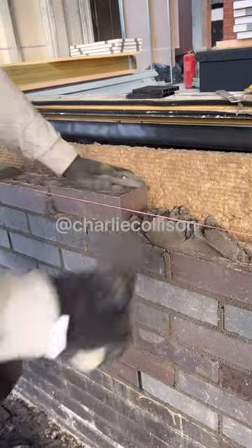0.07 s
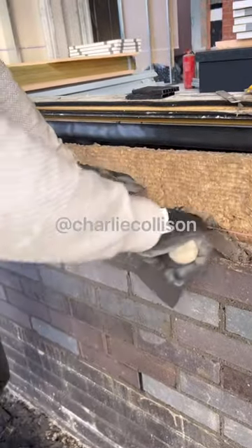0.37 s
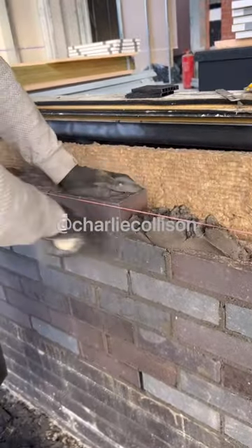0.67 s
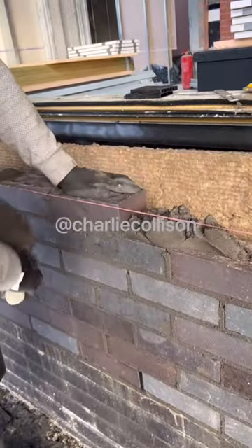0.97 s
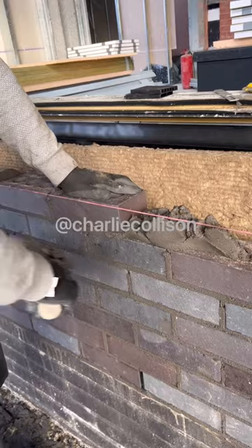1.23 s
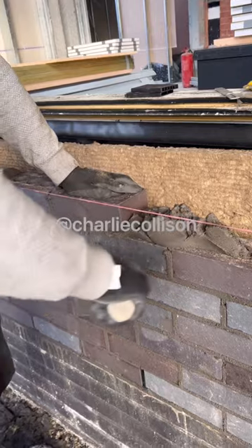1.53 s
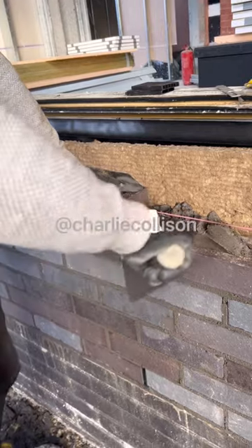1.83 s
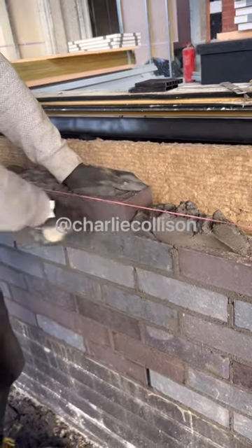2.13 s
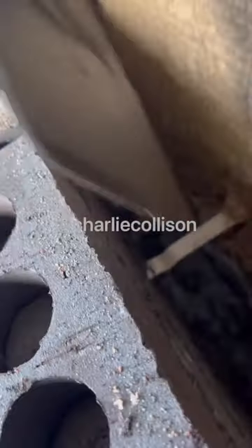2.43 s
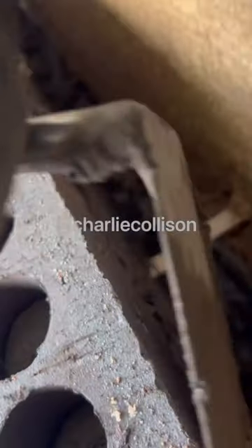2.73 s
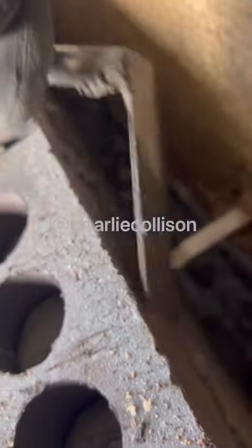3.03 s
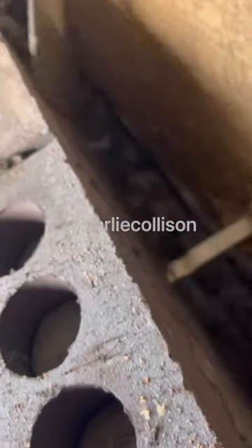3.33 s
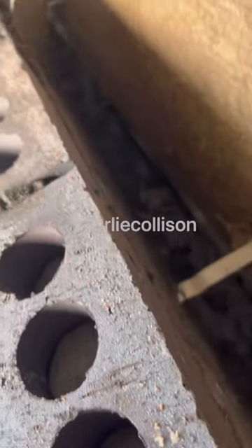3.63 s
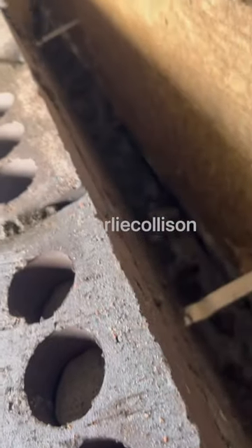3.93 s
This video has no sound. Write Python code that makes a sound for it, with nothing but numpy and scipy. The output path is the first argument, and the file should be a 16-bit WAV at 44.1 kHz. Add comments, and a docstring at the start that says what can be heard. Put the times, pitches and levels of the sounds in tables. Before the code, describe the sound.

A steel trowel scrapes over brick and gritty mortar, above a low building-site rumble.

```python
"""Two rasping sweeps of a steel trowel on brick; then, much closer, a narrow blade taps in and is
dragged along a mortar joint. Sand grains crackle under the steel, which catches on coarse grit
and rings briefly. Loose mortar lands with dull knocks. Behind it a low drone, perhaps a machine,
wavers over the rumble of a building site."""
import sys
import numpy as np
from scipy import signal
from scipy.fft import rfft, irfft, next_fast_len
from scipy.io import wavfile
from scipy.ndimage import uniform_filter1d, map_coordinates

SR = 44100
rng = np.random.default_rng(int(sys.argv[2]) if len(sys.argv) > 2 else 0)


def generate_wav(signal):
    """Clip the signal to [-1, 1] and save it as 16-bit WAV at the path in sys.argv[1]."""
    frames = np.transpose(np.atleast_2d(signal))
    scaled = np.clip(frames, -1, 1) * 32767
    pcm = np.round(scaled).astype(np.int16)
    wavfile.write(sys.argv[1], SR, pcm)


N = 176400
CLOSE_FROM_S, DRAG_FROM_S = 2.45, 3.4
ROLL_OFF_HZ, TOP_HZ = 12100, 16100

# Strokes. Each row: time in seconds, edge pressure in dB, low scrub level in dB.
FIRST_SWEEP_DB = [(.397, -33.5, -36), (.46, -25.5, -36.5), (.525, -24.5, -37), (.545, -22, -32.5),
                  (.585, -22, -28), (.61, -32.5, -27), (.67, -33, -28.5), (.715, -32, -32),
                  (.728, -40, -30)]
SECOND_SWEEP_DB = [(1.807, -44, -35.5), (1.9, -31, -44), (1.95, -27.5, -26.5), (1.99, -28, -27),
                   (2.04, -32, -32.5), (2.1, -34.5, -32), (2.15, -38.5, -37), (2.19, -50.5, -46),
                   (2.3, -59, -54)]
JOINT_PUSH_DB = [(2.84, -38, -38), (2.88, -34, -39), (2.91, -31.5, -31), (2.995, -21, -29.5),
                 (3.025, -26.5, -28), (3.07, -21.5, -29.5), (3.125, -29, -26), (3.19, -23.5, -25.5),
                 (3.245, -27, -31.5), (3.295, -23.5, -25.5), (3.331, -30.5, -26.5), (3.385, -26, -30),
                 (3.428, -31.5, -26.5)]
JOINT_DRAG_DB = [(3.432, -30, -26), (3.49, -28, -32), (3.58, -32.5, -33.5), (3.615, -37, -31.5),
                 (3.645, -28, -29.5), (3.725, -34.5, -30), (3.785, -38, -33.5), (3.83, -31.5, -32),
                 (4, -33, -33.5)]
# Lower edges of the scrub, rasp and hiss bands in Hz.
STROKE_BANDS_HZ = [250, 1150, 5000]
# Spectra of steel on masonry. Each row: frequency in Hz, gain in dB.
WALL_COLOUR_DB = [(280, -0.5), (400, -6), (455, 0.5), (640, -11), (858, -4.5), (1210, -10.5), (1470, -5),
                  (1720, -10), (2210, -6.5), (3800, -8), (5050, -15.5), (5800, -8), (6470, -12),
                  (8300, -7.5), (11500, -12), (15000, -31)]
PUSH_COLOUR_DB = [(280, -7), (590, -13), (793, -0.5), (1000, -8), (1300, -6), (1700, -15.5), (1990, -6.5),
                  (2320, -8), (2950, -4.5), (3250, -10.5), (3720, -3.5), (4970, -12.5), (5800, -3.5),
                  (6470, -8), (7100, -3), (11000, -9.5), (11500, -10), (15000, -27)]
DRAG_COLOUR_DB = [(280, -10.5), (376, -11.5), (445, -0.5), (648, -16.5), (1090, -9), (1700, -19),
                  (2250, -6.5), (3160, -19), (3640, -9), (5050, -12), (5800, -4.5), (6890, -0.5),
                  (7800, -2.5), (8430, -0.5), (11500, -9), (15000, -32)]
# Modes of the broad trowel and narrow blade. Each row: frequency in Hz, level in dB, t60 in seconds.
TROWEL_MODES = [(815, 4, .11), (1059, 0, .12), (1480, -13, .05), (2008, -3, 0.096), (4606, -2, 0.066),
                (6860, 1, .06)]
BLADE_MODES = [(619, -7, 0.081), (1980, 0, 0.06), (2690, 2, 0.035), (3060, -7, .05), (3640, -10, .05),
               (5880, 2.5, 0.037), (6950, -9, .05), (7400, -18, .05), (8380, -1.5, 0.038)]
# Snags. Each row: start in seconds, level in dB, tilt in dB per octave, slip length in seconds.
GRIT_CATCHES = [(.360, -21.5, 8.5, 0.015), (.406, -21, 7, 0.009), (0.454, -19, 2.5, 0.0033),
                (.505, -16.5, 3.5, 0.0051), (.742, -28, -0.5, 0.0053), (0.779, -32.5, 0, .005),
                (1.806, -26, 3, 0.0089), (1.835, -26, 5.5, 0.0069), (1.867, -22.5, 9, 0.002),
                (1.933, -14.5, 1, 0.0031), (2.159, -23, 0, 0.0026), (2.887, -15, 13, 0.0083),
                (2.91, -14.5, 1.5, 0.012), (3.338, -13, 8, 0.0076), (3.444, -10.5, 1.5, 0.0019),
                (3.552, -15.5, 0, 0.0093), (3.571, -14, 0.5, 0.0045), (3.631, -17, -0.5, 0.0076),
                (3.692, -19, 1, 0.01), (3.740, -14, -0.5, .006), (3.757, -18, -0.5, 0.0069),
                (3.790, -16.5, -0.5, 0.002), (3.805, -15.5, -0.5, 0.01)]
# Chatter. Each row: peak time in seconds, pitch in Hz, level in dB, half length in seconds.
CHATTER_TONES = [(0.374, 6880, -24, 0.008), (0.418, 5900, -29, .015), (0.465, 3665, -28, .025),
                 (0.619, 456.7, -27, .025), (.652, 920, -28, .018), (2.161, 2760, -27, 0.0037),
                 (2.99, 2004, -20, 0.016), (2.994, 785, -19.5, 0.015), (2.995, 5900, -25, 0.017),
                 (3.109, 3770, -22.5, 0.017), (3.213, 1314, -28, 0.063), (3.227, 3780, -27.5, 0.084),
                 (3.38, 8380, -18.5, 0.023)]
# Taps. Each row: start in seconds, level in dB, tilt in dB per octave.
BLADE_TAPS = [(.362, -16.5, 4.5), (2.701, -25.5, -2), (2.723, -30, -4), (2.8272, -19, 4.5), (2.855, -30, 7)]
# Mortar landing. Each row: start in seconds, level in dB, pitch in Hz, t60 in seconds.
MORTAR_KNOCKS = [(.746, -18, 362, 0.09), (.776, -27, 479, 0.16), (1.421, -29.5, 1490, 0.046),
                 (2.158, -21.5, 448, 0.047), (2.158, -26, 732, 0.05)]
# Stereo image, left minus right; the very top is out of phase, as in compressed audio.
# Each row: frequency in Hz, then phase in radians or level in dB.
STEREO_PHASE_RAD = [(200, -0.6), (520, 0.62), (780, 1.0), (1030, 1), (1720, 0.63), (7400, 0.55),
                    (8350, -1.1), (11500, -2), (12400, -4.5)]
STEREO_BALANCE_DB = [(380, -2.5), (650, 4.5), (1290, 4.5), (2200, 0)]
# Drone fundamental. Each row: time in seconds, pitch in Hz.
DRONE_PITCH_HZ = [(0, 55.63), (1.8, 54.57), (2.7, 49.8)]
# Background envelopes. Each row: time in seconds, relative level in dB.
DRONE_LEVEL_DB = [(0, -21), (.27, -30), (.5, -25.5), (.68, -25.5), (.76, -17), (.95, -18.5), (1.1, -24.5),
                  (1.32, -21.5), (1.45, -28.5), (1.8, -23), (2.1, -35), (2.55, -35.5), (2.72, -22),
                  (3, -34.5), (4, -39)]
RUMBLE_LEVEL_DB = [(0, -29), (2.35, -28.5), (2.55, -31.5), (4, -37)]
AIR_LEVEL_DB = [(.3, -38.5), (.85, -36.5), (1.1, -39.5), (1.45, -36.5), (2.25, -38), (2.36, -43),
                (2.65, -43.5)]
# Background spectra. Each row: frequency in Hz, gain in dB.
RUMBLE_COLOUR_DB = [(25, -14), (45, 3.5), (115, 0.5), (145, -6), (280, -14), (450, -29.5), (1500, -110)]
AIR_COLOUR_DB = [(250, -2.5), (600, -6), (1200, -12.5), (2800, -19), (5000, -28.5), (7500, -29),
                 (10500, -40), (13000, -62)]
# Background stereo image. Each row: frequency in Hz, left-right correlation.
STEREO_CORRELATION = [(70, 1), (220, .96), (550, 0.13), (5000, 0.037)]


def scraping():
    """Steel on masonry: two sweeps over the wall, then a push and a drag along the joint."""
    return (stroke(FIRST_SWEEP_DB, WALL_COLOUR_DB, TROWEL_MODES, grains_per_s=6000, judder_db=1,
                   ring_gain=0.15, patchy_db=3.7, hiss_db=2, hiss_db_per_s=0)
            + stroke(SECOND_SWEEP_DB, WALL_COLOUR_DB, TROWEL_MODES, grains_per_s=1800, judder_db=2,
                     ring_gain=0.07, patchy_db=3, hiss_db=2, hiss_db_per_s=-6.5)
            + stroke(JOINT_PUSH_DB, PUSH_COLOUR_DB, BLADE_MODES, grains_per_s=6000, judder_db=1.8,
                     ring_gain=0.13, patchy_db=3.5, hiss_db=3.5, hiss_db_per_s=8)
            + stroke(JOINT_DRAG_DB, DRAG_COLOUR_DB, BLADE_MODES, grains_per_s=3200, judder_db=2.5,
                     ring_gain=0.096, patchy_db=3, hiss_db=8.5, hiss_db_per_s=2.5))


def stroke(rows, colour, modes, grains_per_s, judder_db, ring_gain, patchy_db, hiss_db, hiss_db_per_s):
    """Grit under a juddering blade: a low scrub, plus rasp and hiss that follow the pressure."""
    force = grit(N, grains_per_s, spread_db=4, rub_gain=0.6)
    force *= amp(judder_db * np.clip(wobble(170), -2, 1.5))
    rub = unit_rms(coloured(force, lambda hz: along(colour, hz)))
    ring = unit_rms(signal.fftconvolve(force, blade_ring(modes))[:N])
    contact = shifting_resonances(rub + ring_gain * ring, patchy_db)  # contact wanders along the edge
    t, out = np.arange(N) / SR, np.zeros(N)
    elapsed_s, remaining_s = t - rows[0][0], rows[-1][0] - t
    pressure_db, scrub_db = curves(rows)
    top_db = pressure_db + hiss_db + hiss_db_per_s * elapsed_s
    scrub_hz, rasp_hz, hiss_hz = STROKE_BANDS_HZ
    scrub = lambda hz: highpass(hz, scrub_hz) ** 2 - highpass(hz, rasp_hz) ** 2
    rasp = lambda hz: highpass(hz, rasp_hz) ** 2 - highpass(hz, hiss_hz) ** 2
    hiss = lambda hz: highpass(hz, hiss_hz) ** 2 - 0.8 * highpass(hz, ROLL_OFF_HZ, steepness=80)
    for db, band in [(scrub_db, scrub), (pressure_db, rasp), (top_db, hiss)]:
        out += amp(db + wobble(80)) * unit_rms(filtered(contact, band))
    gate = np.clip(np.minimum(elapsed_s, remaining_s) / 0.0075 + 1, 0, 1)
    return out * gate


def grit(n, grains_per_s, spread_db, rub_gain):
    """Sand grains of uneven size breaking over a smooth rub."""
    hits = rng.random(n) < grains_per_s / SR
    grains = hits * rng.choice([-1, 1], n) * amp(spread_db * np.clip(rng.standard_normal(n), -2, 2))
    return unit_rms(unit_rms(grains) + rub_gain * rng.standard_normal(n))


def blade_ring(modes):
    """Decaying steel modes after one contact, energy 1."""
    t = np.arange(SR // 5) / SR
    ring = sum(amp(db + rng.normal(0, 1.9) - 60 * t / t60_s) * np.sin(2 * np.pi * hz * t)
               for hz, db, t60_s in modes)
    return ring / np.linalg.norm(ring)


def shifting_resonances(x, patchy_db):
    """Resonances come and go: smooth random gain over time and frequency."""
    spectra = signal.stft(x, nperseg=512, noverlap=384)[2]
    field = rng.standard_normal(spectra.shape)
    for _ in range(2):
        field = uniform_filter1d(uniform_filter1d(field, size=3, axis=0), size=12, axis=1)
    field -= uniform_filter1d(field, size=12, axis=0)  # one resonance gains what its neighbours lose
    gain = amp(patchy_db * np.clip(unit_rms(field), -2, 2))
    return signal.istft(spectra * gain, nperseg=512, noverlap=384)[1][:N]


def catches():
    """The edge snags on coarse grit and breaks free."""
    out = np.zeros(N)
    for start_s, db, tilt_db_per_oct, slip_s in GRIT_CATCHES:
        joint_colour = PUSH_COLOUR_DB if start_s < DRAG_FROM_S else DRAG_COLOUR_DB
        colour = WALL_COLOUR_DB if start_s < CLOSE_FROM_S else joint_colour
        add(out, start_s, amp(db) * crunch(colour, tilt_db_per_oct, hold_s=slip_s, t60_s=0.042))
    return out


def crunch(colour, tilt_db_per_oct, hold_s, t60_s):
    """A burst of crushed grit: holds near rms 1, then decays."""
    t = np.arange(SR // 5) / SR
    shape_db = lambda hz: along(colour, hz) + tilt_db_per_oct * np.log2(np.clip(hz, 300, 9000) / 4000)
    grains = grit(len(t), grains_per_s=9000, spread_db=1, rub_gain=1)
    envelope = amp(-60 * np.maximum(t - hold_s, 0) / t60_s)
    return coloured(grains * envelope, shape_db) / np.std(coloured(grains, shape_db))


def chatter(flutter_per_s):
    """Chatter feeds one resonance of the blade for a moment."""
    t, out = np.arange(N) / SR, np.zeros(N)
    for peak_s, hz, db, half_s in CHATTER_TONES:
        phase = 2 * np.pi * hz * t + 0.88 * wobble(flutter_per_s)
        swell = np.exp(-((t - peak_s) / half_s) ** 2)
        out += amp(db + 5.2 * wobble(flutter_per_s)) * swell * np.sin(phase)
    return out


def taps():
    """Steel touches brick and rings: first the trowel, later the narrow blade."""
    out = np.zeros(N)
    for start_s, db, tilt_db_per_oct in BLADE_TAPS:
        on_wall = start_s < CLOSE_FROM_S
        colour, modes = (WALL_COLOUR_DB, TROWEL_MODES) if on_wall else (PUSH_COLOUR_DB, BLADE_MODES)
        crack = crunch(colour, tilt_db_per_oct, hold_s=0.0034, t60_s=0.037)
        ring = blade_ring(modes) * np.linalg.norm(crack)
        add(out, start_s, amp(db) * (0.72 * crack + 0.76 * ring))
    return out


def knocks():
    """Loose mortar lands: one broad, damped resonance per knock."""
    t, out = np.arange(SR // 5) / SR, np.zeros(N)
    for start_s, db, pitch_hz, t60_s in MORTAR_KNOCKS:
        resonance = lambda hz: 1 / (1 + ((hz - pitch_hz) / (0.36 * pitch_hz)) ** 2)
        body = unit_rms(filtered(rng.standard_normal(len(t)), resonance))
        envelope = amp(db - 60 * t / t60_s) * (1 - np.exp(-t / 0.0018))
        add(out, start_s, envelope * (body + np.sin(2 * np.pi * pitch_hz * t)))
    return out


def near_walls(x, t60_s, wet_db):
    """Direct sound in stereo, plus a short scatter from the masonry."""
    t = np.arange(SR // 4) / SR
    tail = rng.standard_normal((2, len(t))) * amp(-60 * t / t60_s)
    echo = signal.fftconvolve(x[None], tail / np.linalg.norm(tail[0]), axes=1)[:, :N]
    echo = filtered(echo, lambda hz: hz < ROLL_OFF_HZ)  # low-passed: slightly duller
    echo = np.array([shifting_resonances(channel, patchy_db=5) for channel in echo])
    sides = np.array([[0.5], [-0.5]])
    balance = lambda hz: amp(sides * along(STEREO_BALANCE_DB, hz))
    direct = filtered(x, lambda hz: balance(hz) * np.exp(1j * sides * along(STEREO_PHASE_RAD, hz)))
    return direct + amp(wet_db) * echo


def drone():
    """Perhaps a machine: three low harmonics, wavering in pitch and level."""
    pitch_hz = curves(DRONE_PITCH_HZ)[0] * (1 + 0.0144 * wobble(14))
    phase = 2 * np.pi * np.cumsum(pitch_hz) / SR
    tone = np.sin(phase) + amp(-20.5) * np.sin(2 * phase) + amp(-21) * np.sin(3 * phase)
    return amp(curves(DRONE_LEVEL_DB)[0] + 3 + wobble(16)) * tone


def site():
    """Building-site rumble and open air, both unsteady in level."""
    rumble_db = curves(RUMBLE_LEVEL_DB)[0] + 1 + 1.97 * wobble(16)
    rumble = amp(rumble_db) * ambience(RUMBLE_COLOUR_DB, low_cut_hz=35.8)
    air_db = curves(AIR_LEVEL_DB)[0] + 0.95 * wobble(12)
    return rumble + amp(air_db) * ambience(AIR_COLOUR_DB, low_cut_hz=227)


def ambience(colour, low_cut_hz):
    """Stereo noise of rms 1, centred in the bass and wide in the treble."""
    def response(hz):
        angle = np.arccos(np.clip(along(STEREO_CORRELATION, hz), -1, 1)) / 2
        gain = amp(along(colour, hz)) * highpass(hz, low_cut_hz, steepness=8)
        return gain * [np.cos(angle), np.sin(angle)]
    mid, side = filtered(rng.standard_normal((2, N)), response)
    return unit_rms(np.array([mid + side, mid - side]))


def amp(db):
    """Decibels to gain."""
    return 10 ** (np.asarray(db) / 20)


def unit_rms(x):
    """Scale to rms 1."""
    return x / np.sqrt(np.mean(x ** 2) + 1e-20)


def along(points, hz):
    """Interpolate (Hz, value) points on a log axis."""
    knots_hz, values = np.transpose(points)
    return np.interp(np.log(hz + 1), np.log(knots_hz + 1), values)


def curves(rows):
    """One value per sample for each column after the time."""
    times_s, *columns = np.transpose(rows)
    return [np.interp(np.arange(N) / SR, times_s, column) for column in columns]


def wobble(knots_per_s):
    """Smooth random curve."""
    knots = rng.standard_normal(int(N * knots_per_s / SR) + 4)
    return map_coordinates(knots, [np.arange(N) * knots_per_s / SR])


def filtered(x, gain_of_hz):
    """Zero-padded FFT filter."""
    n = x.shape[-1]
    size = next_fast_len(n + 8192, True)
    return irfft(rfft(x, size) * gain_of_hz(np.fft.rfftfreq(size, 1 / SR)), size)[..., :n]


def coloured(x, db_of_hz, size=4096):
    """Minimum-phase filter with the given dB response."""
    gain = amp(db_of_hz(np.fft.rfftfreq(size, 1 / SR)))
    cepstrum = irfft(np.log(np.maximum(gain, 1e-6)))
    cepstrum[1:size // 2] *= 2
    cepstrum[size // 2 + 1:] = 0
    return signal.fftconvolve(x, irfft(np.exp(rfft(cepstrum))))[:len(x)]


def highpass(hz, edge_hz, steepness=12):
    """High-pass gain."""
    return 1 / np.sqrt(1 + (edge_hz / (hz + 1)) ** steepness)


def add(track, start_s, sound):
    """Mix a sound into a track."""
    part = track[round(start_s * SR):][:len(sound)]
    part += sound[:len(part)]


def scene():
    """Trowel work in front of the site."""
    trowel = scraping() + catches() + chatter(flutter_per_s=200) + taps() + knocks()
    return near_walls(trowel, t60_s=0.071, wet_db=-12) + drone() + site()


def record(dry):
    """Bandwidth as in compressed audio: treble steps down near 12 kHz and ends near 16 kHz."""
    treble_db = lambda hz: 0.5 * highpass(hz, 11000) - 3.3 * highpass(hz, ROLL_OFF_HZ, steepness=80)
    return filtered(dry, lambda hz: amp(treble_db(hz)) * (hz < TOP_HZ))


dry = scene()
out = record(dry)
generate_wav(out)
```